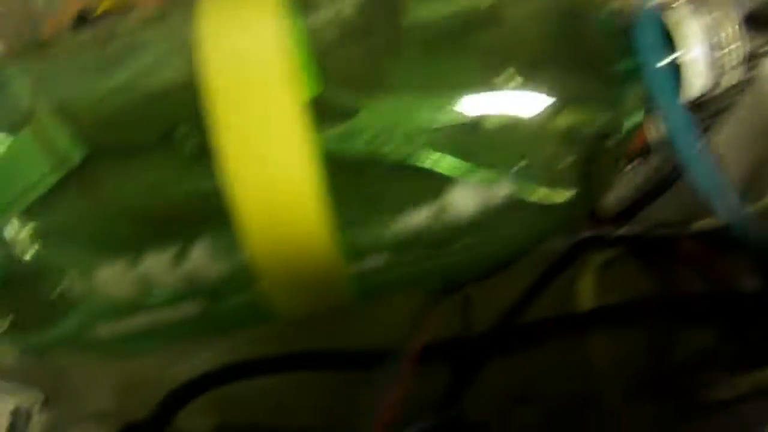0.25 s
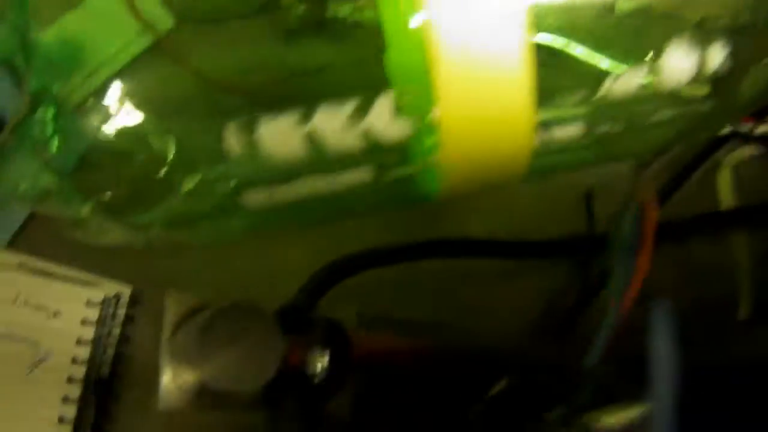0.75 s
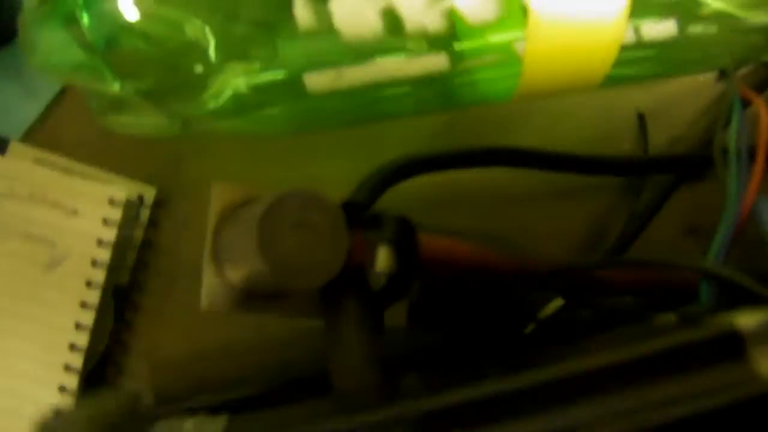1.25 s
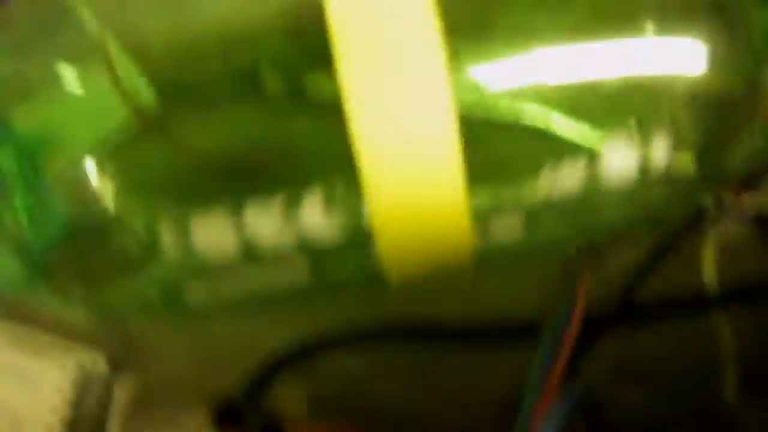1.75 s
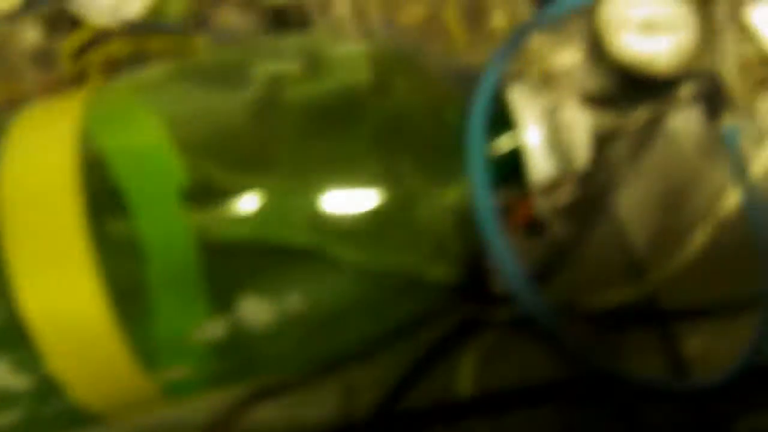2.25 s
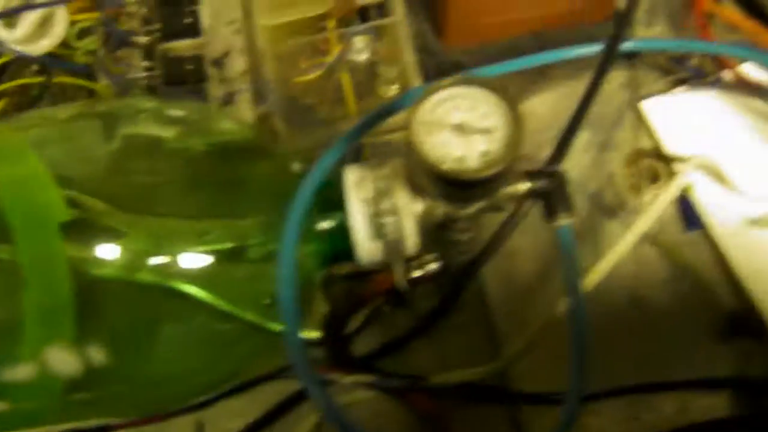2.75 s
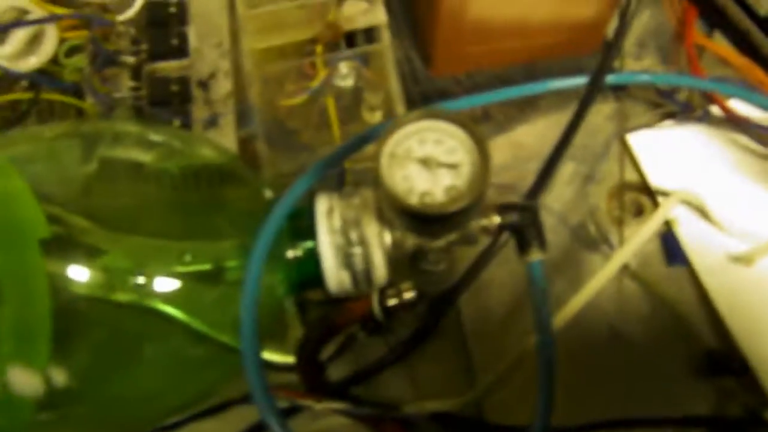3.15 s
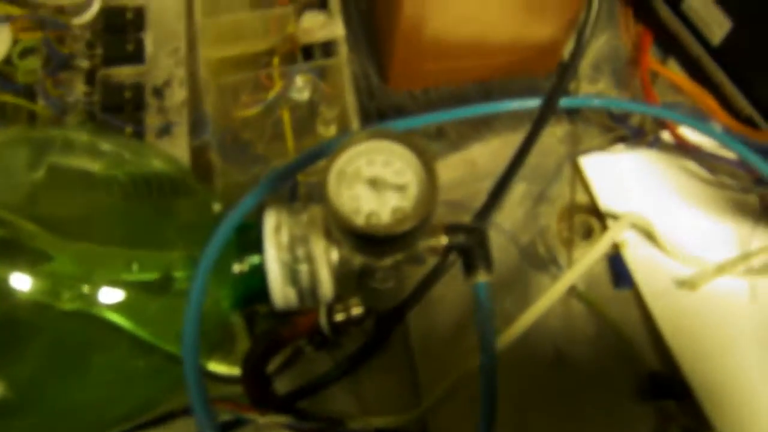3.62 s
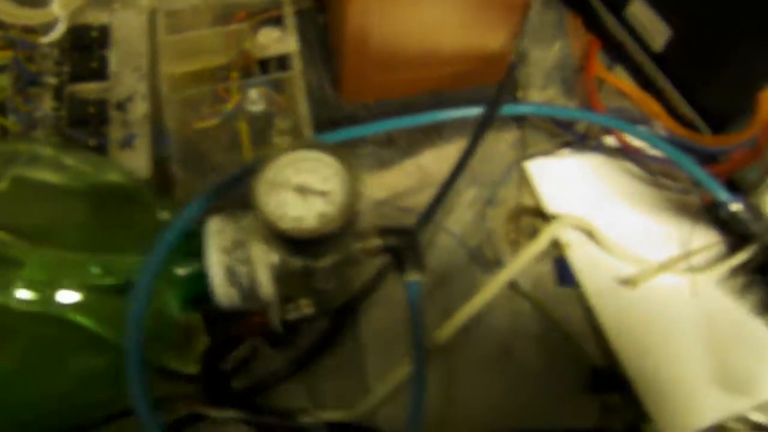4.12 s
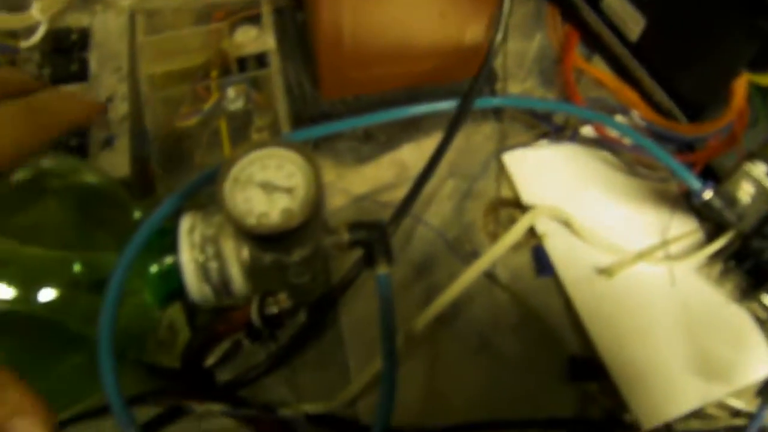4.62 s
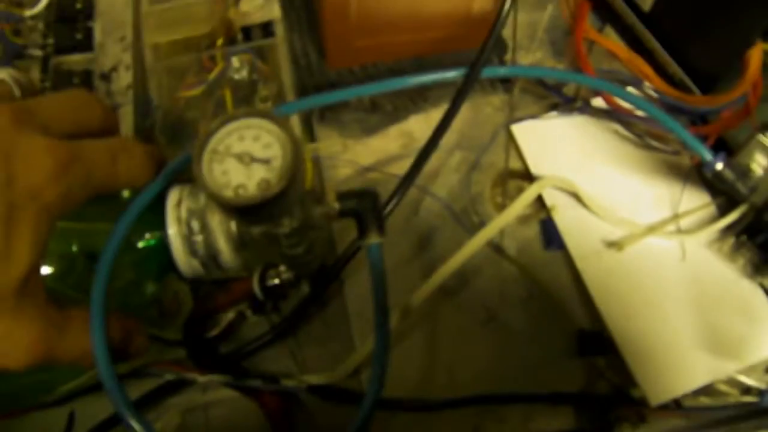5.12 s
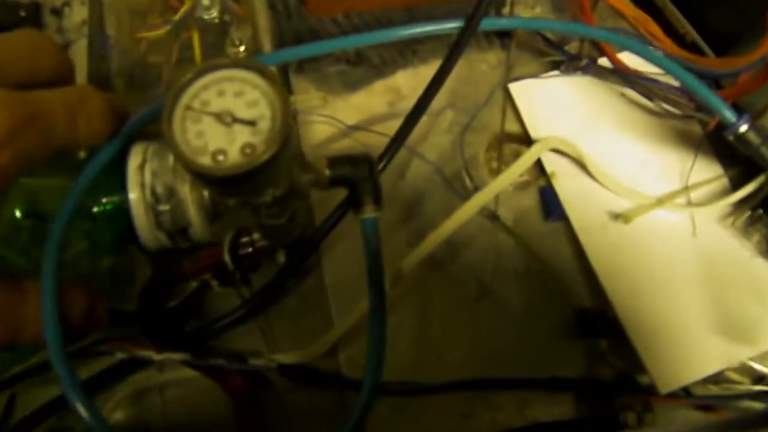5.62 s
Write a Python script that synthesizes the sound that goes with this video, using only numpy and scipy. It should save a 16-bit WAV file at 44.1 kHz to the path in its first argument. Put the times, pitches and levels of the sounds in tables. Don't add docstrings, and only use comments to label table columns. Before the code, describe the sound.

Rapid buzzing, clattering pump strokes run without pause, turning from bright and ticking to hollow and ringing, then crisp and dry again.

```python
import sys
import numpy as np
from scipy import signal
from scipy.fft import rfft, irfft, next_fast_len
from scipy.io import wavfile
from scipy.ndimage import uniform_filter1d

SR = 44100
rng = np.random.default_rng(int(sys.argv[2]) if len(sys.argv) > 2 else 0)


def master_out(mix):
    frames = np.transpose(np.atleast_2d(mix))
    ceiling = np.clip(frames, -1, 1)
    pcm = np.round(ceiling * 32767).astype(np.int16)
    wavfile.write(sys.argv[1], SR, pcm)


def convert_level_to_amplitude(level_db):
    exponent = np.asarray(level_db, float) / 20
    return 10 ** exponent


N = 258855
STROKES_HZ = 41
SIZE = next_fast_len(N)
HZ = np.fft.rfftfreq(SIZE, 1 / SR)


def pump(angle, casing_db):
    # (crank angle [turns], level [dB])
    thump_table = [
        (.442, 1),
        (.942, -1),
        (.05, -10),
        (.55, -11),
    ]
    # (crank angle [turns], half length [ms], level over the rush in five regions [dB])
    puffs = [
        (.172, 2.8, -6, 4, 10, 6.5, 8),
        (.27, 1.8, -3, 3, -2, 3, 4),
        (.47, 2.2, 4, 2, 5, 1, 2),
        (.68, 3.1, -6, 4, 9, 7, 8),
        (.76, 1.8, -3, 3, -2, 4, 4),
        (.95, 2.2, 4, -2, 1, -3, -2),
    ]
    regions_hz = [1000, 1750, 3000, 4500, 7500]
    # (frequency [Hz], share of the power [0-1])
    repeat_table = [(60, .05), (130, .5), (240, .9), (450, .88), (875, .85), (950, .55), (1400, .2),
                    (2500, .35), (4000, .45), (7000, .35), (12000, .2)]
    # (frequency [Hz], width [Hz], depth
    hum_hollow = (860, 210, .85)

    thumps = evened(sum(convert_level_to_amplitude(db) * strikes(angle, at, .02, .35) for at, db in thump_table))
    wear = 0
    for k in (1, 2):
        points = 2152 // k
        wear = wear + np.interp(k * angle % 1, np.arange(points) * k / 2152, rng.standard_normal(points))
    repeat = read(repeat_table, HZ)
    rush = shaped(rng.standard_normal(N), np.sqrt(1 - repeat))
    power = 1 + bursts(angle, puffs, .12, .5)
    above = [1 / (1 + (edge / (HZ + 1)) ** 16) for edge in regions_hz] + [0]
    hollowed = dip(*hum_hollow)
    low = shaped(shaped(thumps, np.sqrt(repeat)) + rush, np.sqrt(1 - above[0]) * hollowed)
    air = shaped(rush + shaped(evened(wear), np.sqrt(repeat)), hollowed)
    high = 0
    for k, region in enumerate(power):
        lift = convert_level_to_amplitude(casing_db) if k == 1 else 1
        band = np.sqrt(np.maximum(above[k] - above[k + 1], 0))
        high += lift * shaped(air * evened(np.sqrt(region)), band)
    return low, high


def bursts(angle, table, wander_ms, spread_db):
    power = 0
    ms = np.arange(-300, 600) * 1000 / SR
    for at, half_ms, *region_db in table:
        shape = np.exp(-abs(ms / half_ms * np.where(ms < 0, 1.6, .75)) ** 1.5)
        blows = strikes(angle, at, wander_ms, spread_db) ** 2
        line = signal.oaconvolve(blows, shape)[300:300 + N]
        power = power + convert_level_to_amplitude(np.array(region_db))[:, None] ** 2 * abs(line)
    return power


def valves(angle):
    # (crank angle [turns], level of each of the five rings [dB])
    tick_table = [
        (.175, -9, -5, 3.5, -7, -9),
        (.25, -9, -20, -14, -20, -20),
        (.318, -20, -12, -4, -14, -5),
        (.672, -9, -6, 0, -7, -12),
        (.745, -9, -20, -9, -20, -20),
        (.815, -16, -12, -2, -12, -3),
    ]
    # (frequency [Hz], ring time [ms], fall of pitch [share per ms])
    ring_table = [
        (2900, 1.1, .035),
        (3550, .9, .002),
        (5650, .65, .002),
        (10800, .25, .002),
        (14300, .2, .002),
    ]
    ms = np.arange(400) * 1000 / SR
    rings = []
    for f, tau, fall in ring_table:
        soft_edge = ms / tau * np.exp(1 - ms / tau)
        rings.append(soft_edge * np.sin(2 * np.pi * f * ms * (1 - fall * ms) / 1000))
    out = 0
    for at, *ring_db in tick_table:
        tick = convert_level_to_amplitude(np.array(ring_db)) @ rings
        out = out + signal.oaconvolve(strikes(angle, at, .05, .8), tick)[:N]
    return out


def chirps(angle):
    at, top_hz, end_hz, fall_ms, ring_ms = .145, 3100, 2120, 4.5, 6
    ms = np.arange(900) * 1000 / SR
    hz = end_hz + (top_hz - end_hz) * np.exp(-ms / fall_ms)
    fade = np.exp(-ms / ring_ms * 2) ** .75
    whistle = ms * fade * np.sin(2 * np.pi * np.cumsum(hz) / SR)
    blows = strikes(angle, at, .1, 1.) + strikes(angle, at + .5, .1, 1.)
    return evened(signal.oaconvolve(blows, whistle)[:N])


def hum(angle, hum_db):
    from_hz, to_hz, fill_s, width_hz = 812, 862, 2.5, 45
    ring_at, fade_db_per_s = .43, -.1
    t = np.arange(N) / SR
    centre = to_hz + (from_hz - to_hz) * np.exp(-t / fill_s)
    out = 0
    for order in (38, 40, 42, 44):
        near = 1 / (1 + 2j * (order * STROKES_HZ / 2 - centre) / width_hz)
        out += np.sqrt(2) * (near * np.exp(2j * np.pi * order * (angle - ring_at))).imag
    return out * convert_level_to_amplitude(hum_db + fade_db_per_s * t)


def gears(gear_db):
    # (time [s], half length [s], lift [dB])
    beam = (2.49, .2, 10.6)
    tone_hz, wander_hz, swell_db = 1801, 1.5, 1.5
    hz = tone_hz + wander_hz * drift(6.)
    level = convert_level_to_amplitude(gear_db + swell(*beam) + swell_db * drift(4.73))
    return np.sqrt(2) * level * np.sin(2 * np.pi * np.cumsum(hz) / SR)


def room_rumble():
    return evened(shaped(rng.standard_normal(N), 1 / (1 + (HZ / 130) ** 4)))


def heard_from(place, low, high, ticks, thump_db):
    deep, broad, modes = place
    hz = np.fft.rfftfreq(8192, 1 / SR)
    plain = convert_level_to_amplitude(read(broad, np.minimum(hz, 15400)))
    power = (plain * convert_level_to_amplitude(-2.0)) ** 2
    for f, width, db in modes:
        power += convert_level_to_amplitude(db) ** 2 / (1 + (2 * (hz - f) / (width + .022 * f)) ** 2) ** 2
    thump = convert_level_to_amplitude(thump_db) * evened(coloured(low, convert_level_to_amplitude(read(deep, hz)), sudden=.45))
    air = evened(coloured(high, np.sqrt(power)))
    return thump + air + coloured(ticks, plain / convert_level_to_amplitude(read(broad, 5750)))


def crank():
    # (time [s], lead on a steady pace [strokes])
    lead = [(0, .183), (.6, .214), (1.2, .264), (1.65, .318), (2.1, .3), (2.4, .25), (2.7, .23),
            (3.3, .233), (3.9, .2), (4.2, .195), (4.8, .228), (5.4, .283), (5.87, .33)]
    t = np.arange(N) / SR
    return (STROKES_HZ * t + np.interp(t, *np.transpose(lead))) / 2


def strikes(angle, at, wander_ms, spread_db):
    turn = np.arange(-1, 125)
    late, size = rng.standard_normal((len(turn), 2)).T
    place = np.interp(turn + at, angle, np.arange(N), -1, -1)
    index = np.clip(place + late * wander_ms * SR / 1000, 0, N - 1).astype(int)
    out = np.zeros(N)
    out[index] = convert_level_to_amplitude(spread_db * size) * (place > 0)
    return out


def drift(top_hz):
    f = np.geomspace(top_hz / 8, top_hz, 12)[:, None]
    phase = f * np.arange(N) / SR + rng.random(f.shape)
    return evened((np.sin(2 * np.pi * phase) / np.sqrt(f)).sum(0))


def swell(s, half_s, lift_db):
    return lift_db * np.exp(-((np.arange(N) / SR - s) / half_s) ** 2)


def coloured(x, gain, sudden=1):
    log = np.log(np.maximum(np.r_[gain, gain[-2:0:-1]], 1e-5))
    spectrum = np.exp(log - 1j * sudden * signal.hilbert(log).imag)
    taps = np.roll(np.fft.ifft(spectrum).real, 1024)[:4096]
    return signal.oaconvolve(x, taps)[1024:1024 + N]


def shaped(x, gain):
    return irfft(rfft(x, SIZE) * gain, SIZE)[..., :N]


def dip(f, width, depth):
    return 1 - min(depth, 1) * np.exp(-(2 * (HZ - f) / width) ** 2)


def read(points, hz):
    f, value = np.transpose(points)
    return np.interp(np.log(hz + 1), np.log(f + 1), value)


def evened(x):
    return x / np.sqrt(np.mean(x ** 2) + 1e-20)


def scene():
    # (time [s], place [0-4])
    walk = [(0, 1.95), (.12, 1.03), (.3, 0.43), (.7, 0.21), (1.6, 0.25), (1.85, .97), (2.15, 1.5),
            (2.4, 1.9), (2.95, 1.9), (3.15, 2.71), (3.8, 3.0), (4.02, 3.24), (4.15, 3.8), (5, 3.89),
            (5.87, 3.85)]
    # (frequency [Hz], width [Hz], level [dB])
    by_pump = [
        [(59, -53), (100, -33), (157, -16.5), (214, -17.5), (233, -8.5), (326, 2.5), (417, -4.5), (440, -22), (594, 7), (768, -11), (802, 17), (846, 2), (874, -31), (1080, -15), (1300, -42), (1690, -47), (2860, -120)],
        [(530, -120), (900, -5), (1080, -2), (1340, -15.5), (2130, -2), (2880, -41.5), (3450, -0.5), (4650, 1.5), (5500, 6), (6360, -13), (7430, 2.5), (8080, -9.5), (15800, -16)],
        [(2147, 305, 7), (3504, 300, 10), (4280, 84, -26), (5480, 130, 4.5), (5980, 230, 8), (8050, 270, -8), (8560, 250, -7), (14300, 180, -30)],
    ]
    swinging = [
        [(59, -67), (100, -23), (157, -20.5), (214, -29.5), (274, -2), (362, -7.5), (412, -6.5), (440, -16), (528, -13), (594, -12), (676, 3), (768, -14.5), (837, 24.5), (903, -18.5), (1300, -11), (1690, -55), (2860, -120)],
        [(530, -60), (900, 2), (1420, -7.5), (2060, -4), (3130, -6), (3660, 4), (4380, -3), (5990, 4.5), (7610, -0.5), (10600, -1), (12000, -10), (14200, -4), (15800, -27)],
        [(2224, 200, 3.5), (3460, 420, -10), (5110, 67, 8), (6160, 46, 10), (6830, 170, -23), (8300, 120, -32), (10900, 130, -2), (15000, 290, -1)],
    ]
    by_bottle = [
        [(59, -42), (100, -40), (214, -20.5), (236, -14), (344, -8), (404, -3), (495, -17.5), (517, -19), (676, -6.5), (736, -4.5), (837, 21), (883, 15.5), (912, -22.5), (994, -6), (1300, -19), (1690, -83), (2860, -120)],
        [(530, -55), (900, -6), (1510, -10), (1760, -8.5), (2350, -20.5), (2620, -7), (3370, -20.5), (5640, -1.5), (7610, -9.5), (8270, -6.5), (10400, -7.5), (14000, -19), (15800, -4.5)],
        [(2030, 130, -3), (2515, 18, -3), (2770, 60, -5.5), (5600, 95, 4), (5890, 28, 3.5), (7600, 240, -24.5), (11360, 99, -5.5), (13600, 330, 0)],
    ]
    by_gauge = [
        [(59, -61), (100, -34), (157, -25), (214, -29), (236, -12), (362, -9), (412, -10.5), (495, -21), (517, -14), (736, -3.5), (837, 2), (912, -5), (1090, -7), (1190, 0), (1300, 2), (1690, -105), (2860, -120)],
        [(530, -59), (900, -5), (1090, -15.5), (1680, -10), (1740, -9.5), (2710, -4.5), (3450, -15.5), (3700, -8), (4330, -13), (5910, -1), (7890, -9.5), (12700, -7), (15800, -8.5)],
        [(2205, 51, -2.5), (2730, 42, -1), (5030, 40, -4), (5790, 13, 9), (5320, 92, 1), (6800, 16, 0), (12860, 370, 1), (14000, 400, -8)],
    ]
    shaded = [
        [(59, -44), (100, -29), (221, -22.5), (236, -13), (362, -12), (430, -12), (551, -9), (620, -20.5), (640, 0), (698, -13), (752, -5.5), (846, 13), (1020, -38), (1080, -57), (1300, -64), (1690, -88), (2860, -120)],
        [(530, -50), (900, -2), (1080, -18), (1260, -14.5), (1720, -22.5), (2650, -19.5), (3210, -19.5), (3490, -15), (5000, -9), (5640, -8.5), (7700, -9.5), (11000, -9), (15800, -18.5)],
        [(2600, 57, -24), (4740, 150, -13), (5870, 66, -19), (6250, 62, -4), (8140, 250, -13.5), (9470, 170, -5.5), (11000, 530, -7.5), (13600, 200, -11)],
    ]
    # (ticks [dB], thump share [dB], casing lift [dB], gear tone [dB], valve whistle [dB])
    shares = [
        (-7.5, -20.5, -5, -45, -36),
        (-14, -13, 5.5, -32, -31),
        (-22, -10.5, 7.5, -34, -31.5),
        (-26, -15, 5, -31, -26.5),
        (-4, -21.5, -0.5, -47, -43),
    ]
    hum_levels = [
        -39,
        -33,
        -30.5,
        -29,
        -38.5,
    ]
    # (time [s], half length [s], lift [dB])
    open_side = (3.96, 0.17, 4.6)
    level_db, fade_db_per_s, rumble_db = -14.5, -0.1064, -65

    t = np.arange(N) / SR
    place = np.clip(np.interp(t, *np.transpose(walk)), 0, 4)
    columns = np.transpose(shares)
    tick_db, thump_db, casing_db, gear_db, chirp_db = (np.interp(place, np.arange(5), c) for c in columns)
    hum_db = np.interp(place, np.arange(5), hum_levels)
    angle = crank()
    low, high = pump(angle, casing_db + swell(*open_side))
    ticks = valves(angle) * convert_level_to_amplitude(tick_db + 12)
    mix = 0
    for k, colours in enumerate([by_pump, swinging, by_bottle, by_gauge, shaded]):
        nearness = np.sqrt(np.clip(1 - abs(place - k), 0, 1))
        mix = mix + nearness * heard_from(colours, low, high, ticks, thump_db)
    mix /= np.sqrt(abs(uniform_filter1d(mix ** 2, 9000)) + 1e-9)
    rumble = convert_level_to_amplitude(rumble_db + 0.54 * (thump_db + 24.5) - .5 * t) * room_rumble()
    mix = mix * convert_level_to_amplitude(level_db + fade_db_per_s * t)
    mix = mix + gears(gear_db) + hum(angle, hum_db)
    mix = mix + convert_level_to_amplitude(chirp_db + swell(*open_side)) * chirps(angle)
    return (mix + rumble)[None]


def band_limit(x):
    return signal.sosfilt(signal.butter(12, 15960, fs=SR, output="sos"), x)


def record(dry):
    # (frequency [Hz], width [Hz], depth [0-1])
    narrow_notch = (7890, 170, .85)
    x = shaped(dry, dip(*narrow_notch))
    x = shaped(np.clip(x, -1, 1), 1 / (1 + (HZ / 15830) ** 300))
    return band_limit(x)


dry = scene()
out = record(dry)
master_out(out)
```